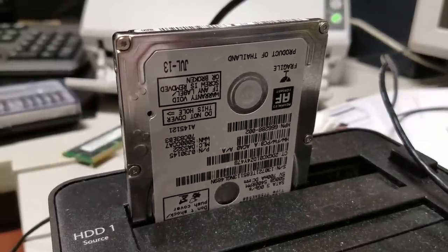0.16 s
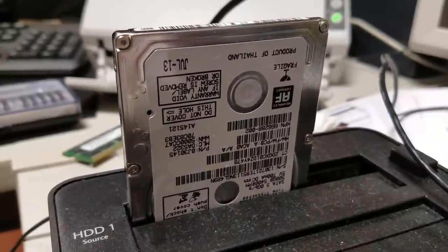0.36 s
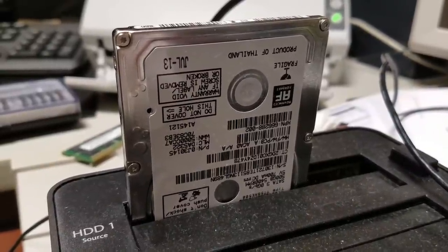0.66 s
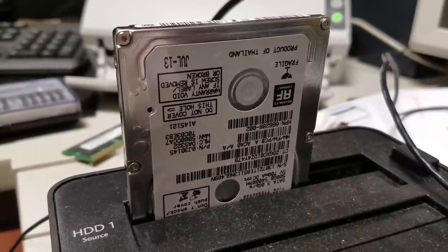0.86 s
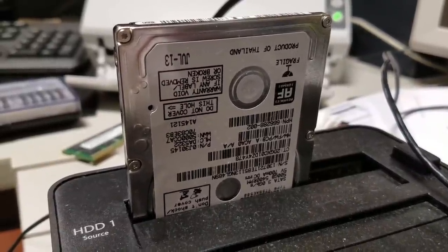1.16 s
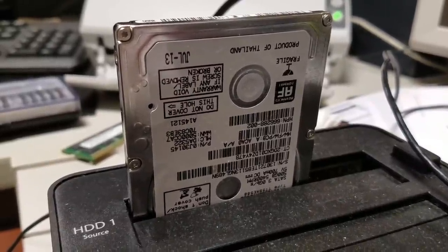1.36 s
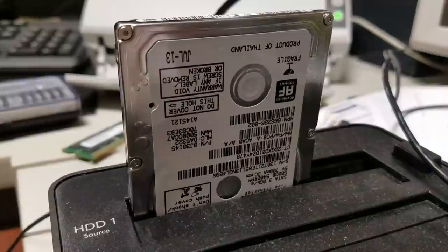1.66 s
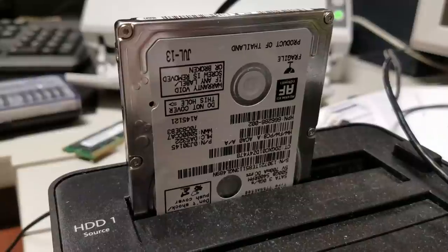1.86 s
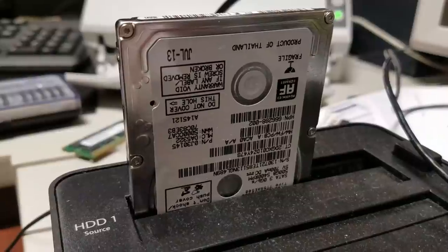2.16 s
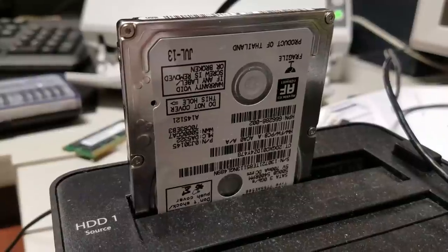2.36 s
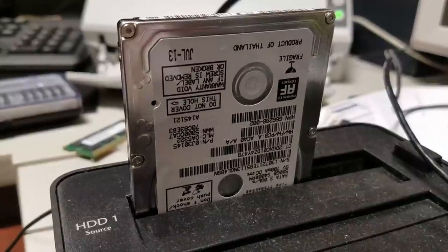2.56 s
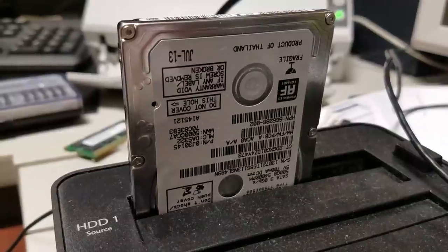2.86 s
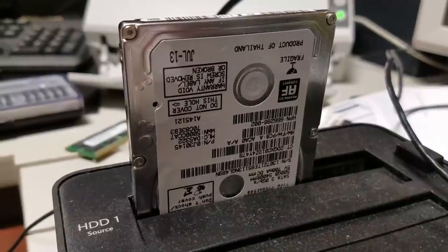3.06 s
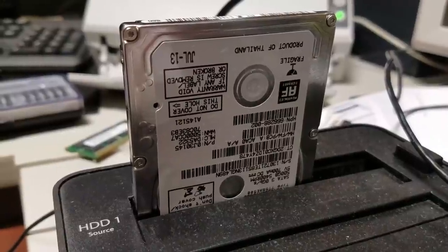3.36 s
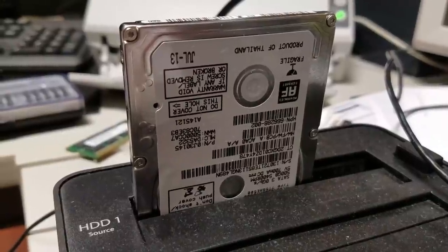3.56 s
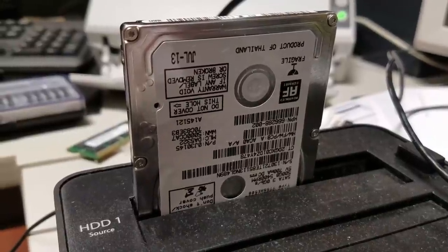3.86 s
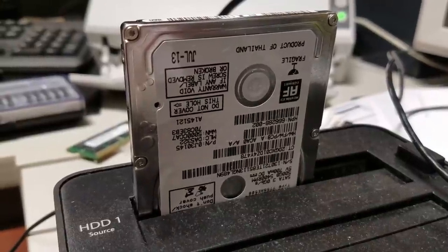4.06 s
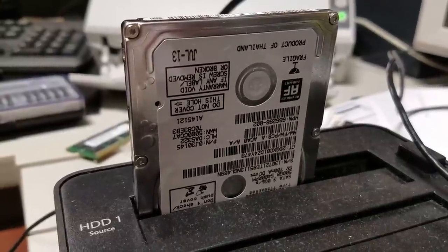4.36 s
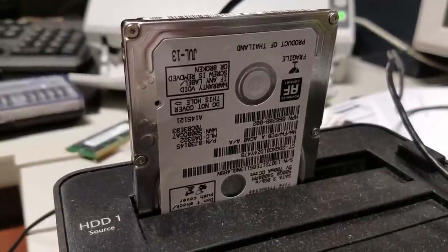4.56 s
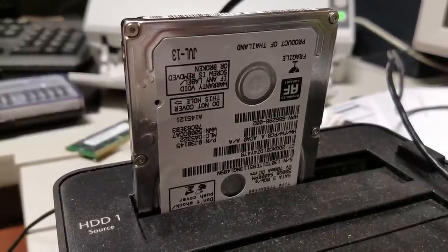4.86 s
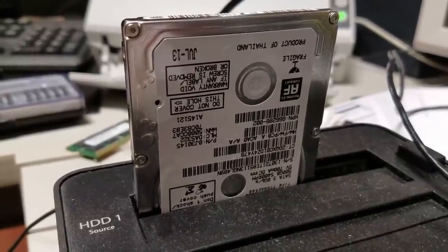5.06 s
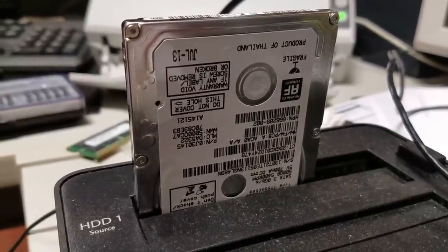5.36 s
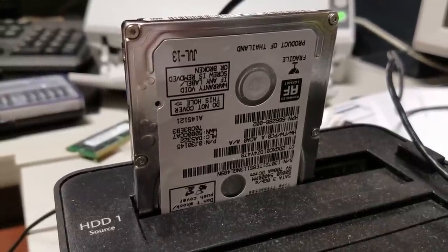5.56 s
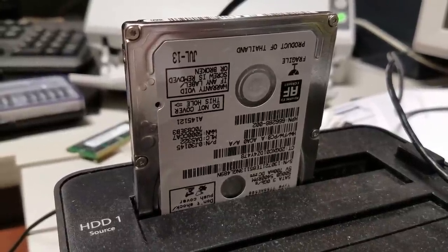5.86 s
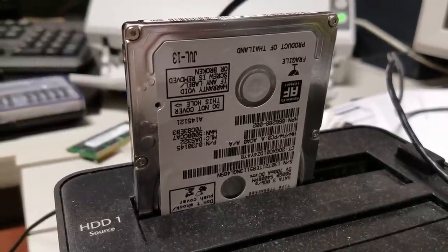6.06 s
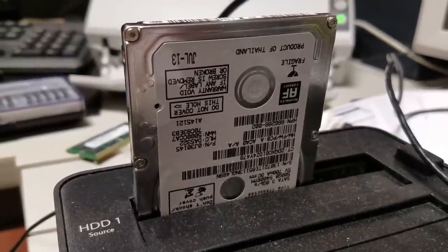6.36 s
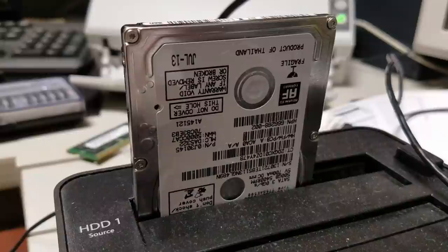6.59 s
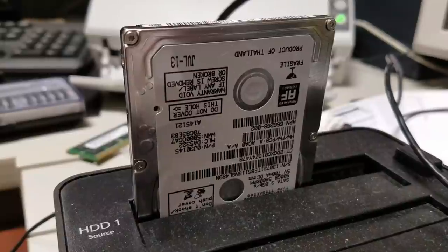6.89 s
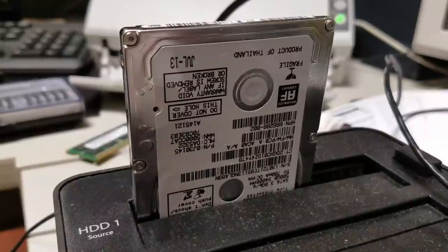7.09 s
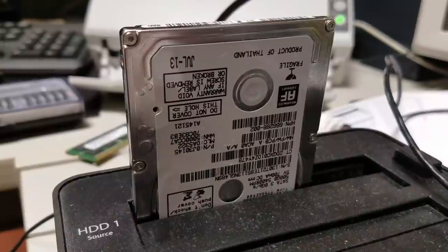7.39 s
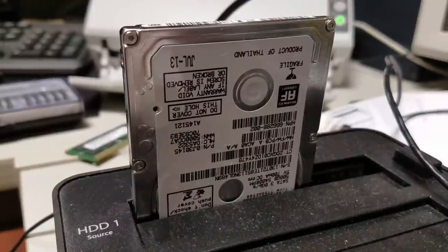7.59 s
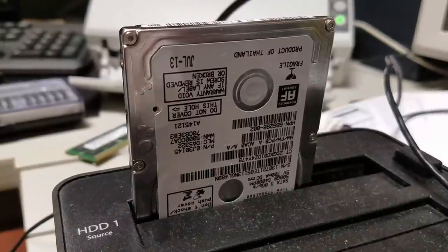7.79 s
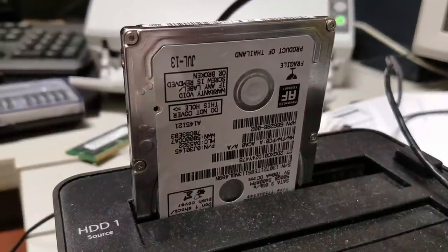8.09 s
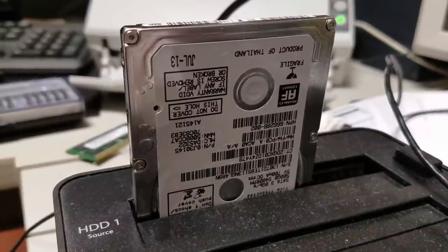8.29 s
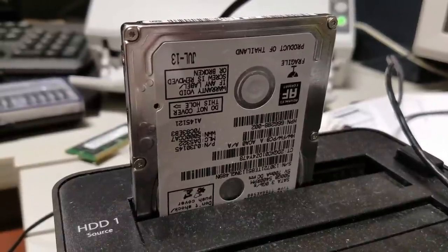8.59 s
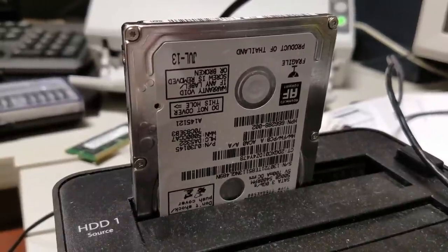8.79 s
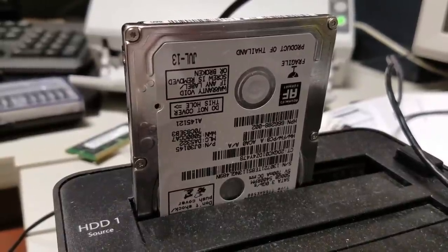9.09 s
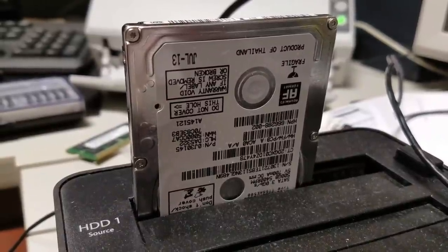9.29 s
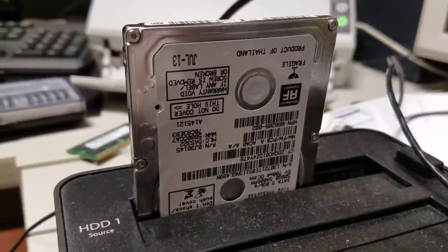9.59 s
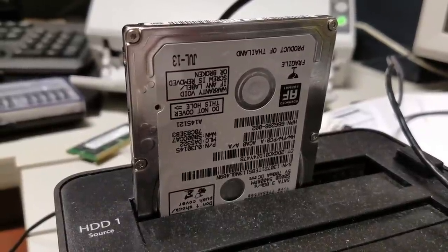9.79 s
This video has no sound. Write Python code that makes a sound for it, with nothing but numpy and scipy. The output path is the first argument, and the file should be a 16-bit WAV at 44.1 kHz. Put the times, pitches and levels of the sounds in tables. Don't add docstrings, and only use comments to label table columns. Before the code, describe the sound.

A failing hard drive in a desk dock ticks and squeaks sharply in irregular runs with duller knocks, over steady fan hum and hiss.

```python
import sys
import numpy as np
from scipy import signal
from scipy.fft import rfft, irfft, next_fast_len
from scipy.io import wavfile
from scipy.ndimage import uniform_filter1d

SR = 44100
rng = np.random.default_rng(int(sys.argv[2]) if len(sys.argv) > 2 else 0)


def log_audio(samples):
    frames = np.atleast_2d(samples).T
    limited = np.clip(frames, -1, 1)
    pcm = np.round(limited * 32767).astype(np.int16)
    wavfile.write(sys.argv[1], SR, pcm)


def volts(x):
    e = np.asarray(x, float) / 20
    return 10 ** e


N = 438354


# [f/Hz, level/dB per Hz]
AIR_SPECTRUM = [(20, -27), (55, -11.5), (85, -12.5), (120, -7.5), (200, -8), (300, -12), (500, -19),
                (850, -21), (2000, -24.5), (3500, -33.5), (9500, -42), (13000, -36.5), (15900, -35),
                (16100, -73)]
# [t/s, level/dB]
AIR_LEVEL = [
    (0.0, -58),
    (9.36, -57),
    (9.94, -58),
]
# [f/Hz, correlation]
AIR_LIKENESS = [(60, 0.77), (180, 0.91), (550, 0.48), (1650, -0.054), (4970, 0.00071), (15000, -0.12)]
# [f/Hz, left minus right level/dB]
ROOM_LEAN = [(60, -4), (240, 1.5), (950, 3), (3770, -0.5), (15000, 1.5)]
# [f/Hz, level/dB, wobble/dB]
HUM_LINES = [(58.4, -74.5, 4), (120.1, -62.5, 0.5), (206.8, -66.5, 2), (293.5, -70, 2.5), (396.3, -82, 5.5),
             (1246, -82, 2.5)]
ROOM_T60_S, ROOM_CUT_HZ = 0.2, 4500
THUD_ROOM_DB, SEEK_ROOM_DB = -18, -35

# [t/s, level/dB]
POPS = [
    (7.7255, -14),
    (8.6216, -1),
]
POP_SETTLES_S = (.008, .013)

# [t/s, level/dB]
DROP_HITS = [
    (9.323, -16.5),
    (9.337, -29.5),
    (9.349, -41.5),
    (9.358, -47),
]
# [f/Hz, level/dB per Hz]
DROP_CRACK = [(180, -55), (450, -34), (770, -5.5), (1410, -11), (1950, -6), (2820, -25), (3220, -22),
              (3510, -28), (5260, -20), (14400, -14), (15600, -13), (16800, -48)]
DROP_MODES = [(775, 3, 2, .1, 4.5, 26), (619, -12, -13, 0.086, 6.5, 90), (688, -17, -15, .1, 12, 90),
              (960, -16, -18, .1, 12, 70), (1055, -1, -2, .1, 4.5, 36), (1400, -12, -14, .1, 3.5, 25),
              (1577, -13, -20, .15, 8, 80), (1730, -11, -8, 0.16, 6, 70), (2010, 8, 1, .1, 2.4, 24),
              (2165, 6, 8, 0.098, 3.2, 20), (2500, -12, -15, .1, 3.0, 30), (2730, -20, -18, .1, 8, 70),
              (3150, -15, -8, .2, 2.5, 36)]
# [f/Hz, level/dB per Hz]
DROP_SNAP = [(2500, -40), (5000, -12), (9000, -8), (12000, -2), (15500, 0), (16200, -12), (16900, -40)]
SNAP_DB, SNAP_T60_S = -14, .03

# [start t/s, end t/s, ticks per s]
HUNT_SPELL = (3.245, 3.66, 22.6)
HUNT_MODES = [(1930, 6, 7, 0.14, 2.5, 14), (1650, 3, 0, .1, 2.5, 16), (5900, -11, -7, 0, 2.5, 16),
              (6150, -13, -11, 0, 2.5, 16), (2250, 0, 0, .1, 2.4, 14), (4120, -18, -18, 0, 3.3, 60)]
# [f/Hz, level/dB]
HUNT_TONES = [(630, -72.5), (765, -73)]
HUNT_DB = -62

KNOCK_TIMES = [0.0056, 0.1502, .3619, .4848, 0.707, 0.8616, 1.0059, 1.1505, 1.583, 1.7066, 1.8722, 2.028,
               2.1724, 2.384, 2.629, 2.7732, 2.9172, 3.806, 4.0288, 4.4416, 5.3746, 7.7177, 8.7817, 9.252]
DOCK_MODES = [(620.5, -13, -10.5, 0.2, 3.7, 95), (819, 5, 3, 0.081, 2.63, 27), (987, 7, 4.5, 0.11, 2.8, 24),
              (1551, -8.5, -13, 0.14, 1.7, 58), (1208, -16, -24, 0.041, 2.4, 41),
              (1386, -15, -13, 0.085, 1.7, 24), (1764, -12.5, -8, 0.16, 1.5, 47),
              (1845, -11, -9, .1, 2, 51), (1999, -2.5, -6, 0.093, 1.36, 34),
              (2133, -19, -14.5, 0.055, 0.68, 40), (3180, -32, -25.5, 0.25, 1.3, 60),
              (4700, -37.5, -13.5, 0, 0.85, 9.4)]
# [f/Hz, level/dB per Hz]
KNOCK_CRUNCH = [(450, -40), (650, -4), (1300, -2), (2050, -2), (2350, -30), (5000, -45)]
KNOCK_DB, BOUNCE_S, BOUNCE_DB = -38, .0165, -14
CRUNCH_DB, CRUNCH_T60_S = -15, .045

# [t/s, squeal level/dB, frame level/dB re squeal]
CLEAN_SEEKS = [(.2147, -24.5, -27), (.5206, -26.5, -41), (1.168, -27.5, -32), (1.7424, -26, -44),
               (4.0927, -26, -38), (4.2258, -25, -28.5), (4.6367, -26, -32), (4.7047, -25.5, -32),
               (5.1633, -24.5, -23), (5.5013, -26, -27), (5.6925, -25, -27), (6.0367, -26.5, -39),
               (6.347, -23.5, -30), (6.4018, -25.5, -26), (6.4592, -24.5, -28.5), (6.6702, -24, -28),
               (7.0813, -25.5, -28), (7.5701, -26, -28), (7.7808, -26.5, -33), (8.1249, -24.5, -33),
               (8.3153, -25, -29), (8.9144, -24.5, -26), (9.0369, -24.5, -29), (9.1037, -23.5, -30),
               (9.3093, -24, -27), (9.8995, -24.5, -33)]
# [t/s, squeal level/dB, frame level/dB re squeal]
COVER_SEEKS = [(1.5961, -26.5, -35), (2.4684, -25.5, -28), (4.57, -25, -32), (5.0721, -26, -27),
               (6.159, -25, -28), (6.2335, -25.5, -31), (6.737, -24.5, -29), (7.1481, -25, -26.5),
               (7.215, -25, -31), (8.193, -24.5, -28), (8.3702, -25, -31), (8.9706, -25.5, -24.5),
               (9.1514, -25, -26)]
# [t/s, squeal level/dB, frame level/dB re squeal]
RETURN_SEEKS = [(0.7269, -26.5, -23), (2.2377, -27, -19), (3.8813, -26, -18), (3.9276, -25, -21),
                (4.1583, -25.5, -17.5), (4.2926, -26.5, -15.5), (5.182, -25, -25.5), (5.4365, -26, -17.5),
                (5.57, -26, -16), (5.6368, -26.5, -18), (6.0922, -26, -18), (6.3, -25.5, -18),
                (6.548, -25.5, -16), (6.598, -24, -19), (8.2593, -27.5, -16.5), (8.807, -26.5, -30),
                (8.859, -26, -17.5)]
# [t/s, squeal level/dB, frame level/dB re squeal, cover level/dB re squeal]
SHORT_SEEKS = [(.2613, -31.5, -28, -23.5), (.56, -33, -22, -30), (.57, -37, -6, -25),
               (.5826, -32, -20, -25), (.5995, -39, -20, -28), (0.606, -33, -26, -24),
               (.6185, -38, -20, -26), (1.496, -60, -18, -16), (1.926, -43, -22, -23),
               (2.2268, -40, -24, -40), (2.4379, -44, -17, -29), (2.4495, -34.5, -25, -25),
               (2.5277, -33, -19, -24), (4.349, -40.5, -26, -30), (4.4943, -33.5, -29, -26),
               (4.6827, -33.5, -27, -32), (5.052, -34.5, -25, -28), (5.1405, -33.5, -29, -28),
               (5.228, -48, -14, -18), (5.262, -42.5, -11, -17), (5.272, -45, -16, -22),
               (5.283, -47.5, -16, -24), (6.216, -34, -24, -31), (6.2835, -32.5, -20, -32),
               (6.383, -33, -23, -26), (6.5165, -32, -22, -28), (7.548, -38.5, -14, -23),
               (9.1606, -33, -24, -26)]
# [t/s, squeal level/dB, frame level/dB re squeal, cover level/dB re squeal]
TWITCHES = [(0.0556, -53, -10, -17), (.2013, -47, -12, -21), (.2645, -52, 11, -30), (7.536, -58, -4, -30),
            (6.352, -52, 2, -30), (.409, -50.5, -8, -18.5), (.767, -52, -12, -24), (.915, -55, -8, -19),
            (1.94, -54, -14, -26), (6.593, -45, -4, -30), (1.0595, -54, -10, -21), (1.487, -57, -6, -24),
            (2.0814, -56.5, -8, -18), (2.2894, -45.5, -12, -17), (2.826, -56.5, -2, -20),
            (2.9202, -41, -17, -25), (3.715, -57, -8, -20), (3.86, -50, -10, -23),
            (4.0756, -45.5, -10, -21), (4.14, -48, -7, -22), (4.338, -48, -8, -22), (5.1267, -47, -13, -24),
            (5.2507, -45, -9, -17), (5.488, -44, -16, -31), (5.5484, -43, -15, -24),
            (6.6553, -40.5, -10, -38), (7.6166, -42.5, -9, -26), (8.7043, -56.5, -3.5, -15),
            (9.169, -45, -25, -17), (9.2708, -58, -10, -18), (9.7667, -62, -5, -28)]
# [squeal/dB, whistle/dB, cover/dB, platter/dB, all re the seek's level]
SEEK_COLOURS = [
    (0, -9.5, -36.5, -36.5),
    (0, -10, -30.5, -38),
    (-1, -15, -35.5, -29),
    (-1.5, -6, -0.5, -34.5),
    (-3.5, -18, 0, -31),
]
# [lead t/s, force/dB, then squeal, whistle, cover, platter, frame/dB re force]
STOP_TWITCH = (.002, -61, -6, -12, -22, -14, -3)
# [start t/s, end t/s, level/dB]
GRINDS = [
    (.61, 0.632, -51),
    (6.355, 6.392, -47),
]

SQUEAL_MODES = [(5060, -14, -4, 0.33, 1.0, 57), (5187, 1.5, -24, 0.47, 2.0, 23),
                (5314, -30, -10, 0.39, 1.4, 68), (6060, -26, -17, 0.014, 1.5, 23),
                (6310, -19, -25, 0.071, 0.83, 19), (7500, -27, -18.5, 0.32, 0.83, 17)]
SMALL_PARTS = [(4480, -24, -18, 0.13, 1.8, 17), (5896, -10, -16, 0.24, 1.4, 20),
               (6670, -19, -19, .3, 1.3, 25), (7000, -19, -14, .4, 1.5, 25),
               (7215, -20, -11.5, 0.32, 1.5, 25), (7760, -18, -14, 0.34, 1.5, 22),
               (8300, -12, -23, .5, 1.5, 22), (9680, -17, -27, .2, 2.2, 23), (10930, -21, -28, .3, 2.3, 25),
               (11500, -23, -30, 0.33, 2.5, 23), (13030, -20, -28, .4, 2.5, 25),
               (14400, -17, -33, .4, 2.5, 15), (14900, -16, -30, .4, 2.5, 25),
               (16300, -13, -42, .1, 1.5, 7.6)]
TREBLE_MODES = [(8830, 6.5, -15, 0.57, 1.94, 9.2), (10470, -9, -13, 0.3, 3.0, 20),
                (12390, -12, -27, .2, 2.3, 21), (13500, -7, -34, .6, 2.5, 15)]
WHISTLE_MODES = [(15590, 19.5, -2, 0, 4.5, 13), (15400, 3, -14, 0.08, 2.2, 14),
                 (15520, -12, -12, .1, 5.5, 45)]
COVER_MODES = [(4136, 11, 9.7, -0.18, 2.1, 72), (4100, -6, -6, -.2, 3.5, 60),
               (4300, -3, -3, -0.13, 1.9, 28)]
PLATTER_MODES = [(3167, -2, 11, 0.26, 4.4, 46), (3160, 6.1, -7, 0.088, 13.5, 76)]
FRAME_MODES = [(1987, 8, -0.5, 0.11, 2.8, 36), (1915, -1.5, 1, 0.15, 2.6, 50),
               (2390, -8.5, -6.5, 0.042, 1.0, 30), (2760, -11, -11, .1, 1.5, 22),
               (1250, -13, -15, .1, 2.5, 30)]
AFTER_RING_MODES = [(5215, -31, -29, 0.3, 16, 230), (5262, -36, -27, 0.05, 26, 220),
                    (5065, -42, -28, 0.35, 30, 220), (5155, -36, -31, .2, 24, 220),
                    (4980, -44, -38, .3, 18, 130), (5320, -42, -42, .2, 12, 120),
                    (7290, -51, -42, 0, 2.7, 180), (9080, -35, -50, 0, 9.4, 62),
                    (5890, -43, -42, 0, 9, 100), (6100, -47, -42, 0, 9.4, 90), (6270, -50, -41, 0, 9, 100),
                    (4700, -47, -41, 0, 9, 100)]
THUMP_MODES = [(842, 2, -1, 0.086, 3.3, 36), (1080, 2, 0.5, .1, 3.5, 43), (1400, -5, -8, .1, 3.1, 20)]
# [f/Hz, level/dB per Hz]
RATTLE_SPECTRUM = [(900, -27.5), (1500, -17.5), (2500, -16), (3600, -26.5), (5500, -12.5), (7500, -18.5),
                   (11500, -30), (15700, -22.5), (16100, -40), (16900, -65)]
# [f/Hz, width/Hz, level/dB]
RATTLE_HUMPS = [(8880, 470, 7), (10430, 430, 8), (12360, 320, 9), (13400, 370, 2), (15600, 300, 1.5)]
# [f/Hz, left minus right level/dB]
RATTLE_LEAN = [(3000, 0.5), (7000, 0.5), (10000, 7.5)]
# [t/s, level/dB]
SHELF_ECHOES = [
    (.0195, -22),
    (.026, -20),
]
BRAKE_MS, BRAKE_T60_MS = 6.3, 3.0
TREBLE_DB = -7.5
RATTLE_DB, RATTLE_T60_S = -22.5, 0.023
RATTLE_TAIL_DB, RATTLE_TAIL_T60_S = -32, 0.15
WEAK_RATTLE_SHARE, WEAK_RING_LOSS, THUMP_FOLLOWS = 0.35, .3, 0.14
THUMP_DB = -58.5
DESK_ECHO_S, DESK_ECHO_DB = 0.013, -24


def rms_one(x):
    return x / np.sqrt(np.mean(x ** 2) + 1e-20)


def at_hz(points, hz):
    point_hz, values = np.array(points)[:, :2].T
    return np.interp(np.log(hz), np.log(point_hz), values)


def humped(spectrum, humps):
    hz = np.geomspace(800, 17000, 600)
    lift = sum(db / (1 + (2 * (hz - at) / width) ** 2) for at, width, db in humps)
    return np.transpose([hz, at_hz(spectrum, hz) + lift])


def drift(rate):
    r = np.exp(-80 * np.pi * rate / SR)
    noise = rng.standard_normal(N // 40 + 2002)
    slow = signal.lfilter([1], [1, -2 * r, r * r], noise)[2000:]
    return np.interp(np.arange(N) / 40, np.arange(len(slow)), rms_one(slow))


def coloured(spectrum, likeness, patchy_db, lean=ROOM_LEAN):
    size = next_fast_len(N)
    hz = np.maximum(np.arange(size // 2 + 1) * SR / size, 1)
    mid, side = rfft(rng.standard_normal((2, size)))
    alike = np.clip(at_hz(likeness, hz), -1, 1)
    gain = volts(at_hz(spectrum, hz) + at_hz(lean, hz) * np.array([[.5], [-.5]]))
    pair = gain * (np.sqrt(1 + alike) * mid + np.sqrt(1 - alike) * side * [[1], [-1]])
    return rms_one(irfft(pair, size)[:, :N] * volts(patchy_db * drift(2.3)))


def strike(times, levels_db, modes, spread_db, braked=False):
    hz, left_db, right_db, lag, rise, t60 = np.transpose(modes)[:, :, None]
    ms = np.arange(0, 14 if braked else min(200, 1.2 * t60.max()), 1000 / SR)
    swell = np.sin(np.pi / 2 * np.clip(ms / np.abs(rise), 0, 1)) ** 2
    shape = swell * volts(-60 * ms / t60)
    if braked:
        shape = shape * volts(-60 / BRAKE_T60_MS * np.clip(ms - BRAKE_MS, 0, None))
    turns = hz * ms / 1000
    left = volts(left_db) * np.sin(2 * np.pi * turns)
    right = volts(right_db) * np.sin(2 * np.pi * (turns - lag))
    pair = np.array([left, right]) * shape
    chance_db = spread_db * rng.standard_normal((len(times), len(modes)))
    strengths = volts(np.asarray(levels_db)[:, None] + chance_db)
    out = np.zeros((2, N + len(ms)))
    for s, strength in zip(times, strengths):
        at = round(s * SR)
        out[:, at:at + len(ms)] += strength @ pair
    return out[:, :N]


def dying(times, levels_db, t60):
    clicks = np.zeros(N)
    clicks[np.round(np.asarray(times) * SR).astype(int)] = volts(levels_db)
    r = volts(-60 / (t60 * SR))
    return uniform_filter1d(signal.lfilter([1], [1, -r], clicks + 1e-18), size=45, origin=22)


def fan_air():
    s, level_db = np.transpose(AIR_LEVEL)
    level = volts(np.interp(np.arange(N) / SR, s, level_db) - 3.0)
    return level * coloured(AIR_SPECTRUM, AIR_LIKENESS, patchy_db=.5)


def hum():
    t = np.arange(N) / SR
    lines = 0
    for hz, db, wobble_db in HUM_LINES:
        level = np.sqrt(2) * volts(db + wobble_db * drift(7.1))
        lines = lines + level * np.sin(2 * np.pi * hz * t + 0.61 * drift(2.7))
    return lines


def room(x):
    t = np.arange(SR // 2) / SR
    echo = rng.standard_normal((2, len(t))) * volts(-60 * t / ROOM_T60_S) * (t > .004)
    dull = np.exp(-2 * np.pi * ROOM_CUT_HZ / SR)
    echo = signal.lfilter([1], [1, -dull], echo)
    return signal.fftconvolve(x, echo / np.sqrt(np.sum(echo ** 2) / 2), axes=1)[:, :N]


def pops():
    step = np.arange(SR // 20) == 0
    drain = np.exp(-2 * np.pi * 70.0 / SR)
    first = signal.lfilter([0.39, 0.064, 0.19, 0.26, 0.11], [1, -drain], step)
    w, r = 2 * np.pi * 94.0 / SR, np.exp(-np.pi * 115.0 / SR)
    fade = np.cos(np.pi / 2 * np.interp(np.arange(len(step)) / SR, POP_SETTLES_S, [0, 1])) ** 2
    swing = signal.lfilter([1, -2, 1], [1, -2 * r * np.cos(w), r * r], first) * fade
    out = np.zeros((2, N))
    for s, level_db in POPS:
        out[0, round(s * SR):][:len(swing)] += volts(level_db) * swing
    return out


def dropped_object():
    s, level_db = np.transpose(DROP_HITS) - [[.0012], [0]]
    burst = dying(s, level_db - 12.5, 0.038) + dying(s, level_db - 29.5, 0.13)
    crack = burst * coloured(DROP_CRACK, [(500, 1.0), (16000, .1)], 0)
    first = dying(s[:1], level_db[:1] + SNAP_DB, SNAP_T60_S)
    snap = first * coloured(DROP_SNAP, [(5000, .3)], 0)
    return snap + crack + strike(s, level_db - 8, DROP_MODES, .6)


def hunting():
    start, end, per_s = HUNT_SPELL
    t = np.arange(N) / SR
    fade = np.clip(np.minimum(t - start, end - t) / .03, 0, 1)
    tone = sum(volts(db) * np.sin(2 * np.pi * hz * t) for hz, db in HUNT_TONES) * fade
    ticks = np.arange(start, end, 1 / per_s)
    late = rng.random((len(ticks), 7)) ** 1.5 * .04
    touches = (ticks[:, None] + late).ravel()
    return strike(touches, HUNT_DB - 120 * late.ravel(), HUNT_MODES, 3.5) + tone


def knocks():
    s = np.array(KNOCK_TIMES) - .0008
    level_db = np.full(len(s), KNOCK_DB)
    chirp = [(5000, 0, 0, 0, 2.5, 14), (5960, 4, 5, 0, 2.2, 15), (8950, 1, -9, 0, 2.5, 9)]
    lift = strike(s + .019, level_db - 28, chirp, 3.5)
    crunch = dying(s, level_db + CRUNCH_DB, CRUNCH_T60_S) * coloured(KNOCK_CRUNCH, [(1000, .7)], 0)
    bounce = strike(s + BOUNCE_S, level_db + BOUNCE_DB, DOCK_MODES, 2.3)
    return strike(s, level_db, DOCK_MODES, 0.8) + bounce + lift + crunch


def grinding():
    rows = []
    for start, end, level_db in GRINDS:
        even = np.arange(start, end, .006)
        times = even + rng.uniform(0, .004, 20)[:len(even)]
        rows += [(s, level_db, 0, -12, -14, -30, -12) for s in times]
    return rows


def seek_rows():
    kinds = CLEAN_SEEKS, COVER_SEEKS, RETURN_SEEKS, SHORT_SEEKS, TWITCHES
    rows = []
    for table, (squeal, whistle, cover, platter) in zip(kinds, SEEK_COLOURS):
        for s, db, frame, *own_cover in table:
            rows.append((s, db, squeal, whistle, cover + sum(own_cover), platter, frame))
    stops = [(s - STOP_TWITCH[0], *STOP_TWITCH[1:]) for s in KNOCK_TIMES]
    return rows + stops + grinding()


def shelf_echo(x):
    late = [volts(db) * np.pad(side, (round(s * SR), 0))[:N] for side, (s, db) in zip(x, SHELF_ECHOES)]
    return np.array(late)


def seeks():
    s, level_db, squeal_db, whistle_db, cover_db, platter_db, frame_db = np.transpose(seek_rows())
    early, loss_db = s - .0011, level_db.max() - level_db

    bright = strike(early, level_db + TREBLE_DB, TREBLE_MODES, 1.2)
    bright += strike(early - .0007, level_db + whistle_db, WHISTLE_MODES, 1.3)
    lag = round(DESK_ECHO_S * SR)
    bright = bright + volts(DESK_ECHO_DB) * np.pad(bright, ((0, 0), (lag, 0)))[:, :N]

    arm = strike(s + .0003, level_db + squeal_db, SQUEAL_MODES, 1.5, braked=True)
    arm += strike(early - .0005, level_db + frame_db, FRAME_MODES, 2.2)
    arm = arm + shelf_echo(arm) + bright
    arm += strike(early, level_db + TREBLE_DB, SMALL_PARTS, 1.7, braked=True)

    body = strike(s, level_db + cover_db, COVER_MODES, 0.89)
    body += strike(s, level_db + platter_db, PLATTER_MODES, 0)
    body += strike(s, level_db + 2 * squeal_db - WEAK_RING_LOSS * loss_db, AFTER_RING_MODES, 2.5)
    body += strike(early, THUMP_DB - THUMP_FOLLOWS * loss_db, THUMP_MODES, 2.1)

    rattle_db = level_db + WEAK_RATTLE_SHARE * loss_db
    burst = dying(early, rattle_db + RATTLE_DB, RATTLE_T60_S)
    burst += dying(early, rattle_db + RATTLE_TAIL_DB, RATTLE_TAIL_T60_S)
    spectrum = humped(RATTLE_SPECTRUM, RATTLE_HUMPS)
    return arm + body + burst * coloured(spectrum, [(1000, 0.52), (16000, 0.1)], 0, RATTLE_LEAN)


def scene():
    arm, thuds = seeks(), knocks() + dropped_object()
    walls = room(volts(SEEK_ROOM_DB) * arm + volts(THUD_ROOM_DB) * thuds)
    return arm + thuds + walls + hunting() + fan_air() + hum() + pops()


def low_pass(x):
    return signal.sosfilt(signal.butter(12, 17140, fs=SR, output="sos"), x)


def record(dry):
    cut = signal.sosfilt(signal.butter(8, 16700, fs=SR, output="sos"), dry)
    return low_pass(cut - .0005)


dry = scene()
out = record(dry)
log_audio(out)
```